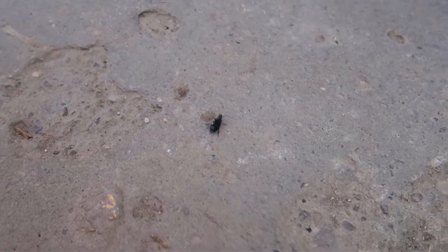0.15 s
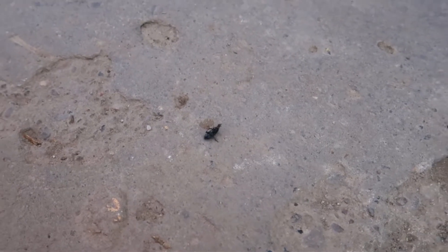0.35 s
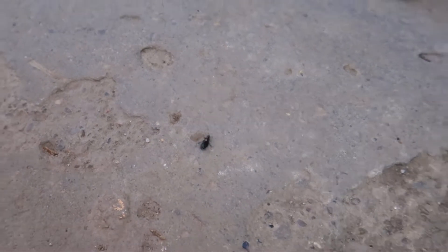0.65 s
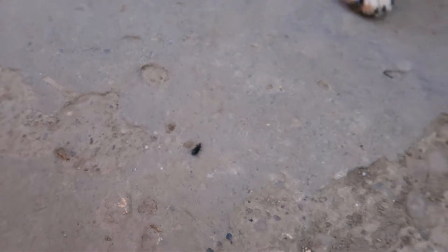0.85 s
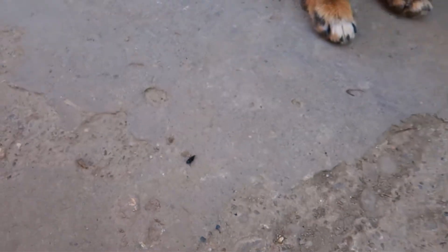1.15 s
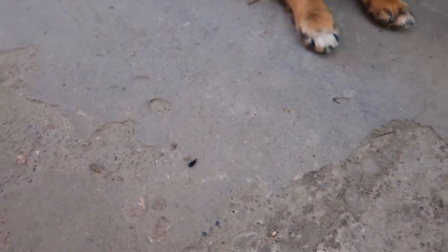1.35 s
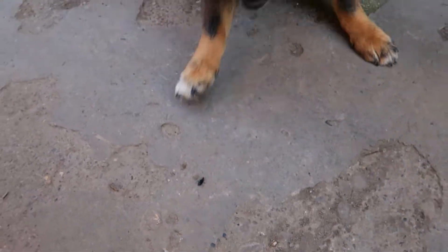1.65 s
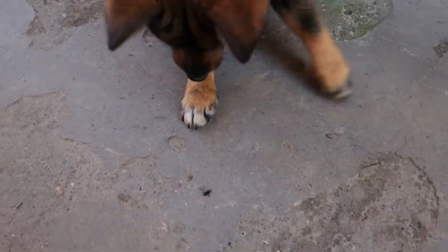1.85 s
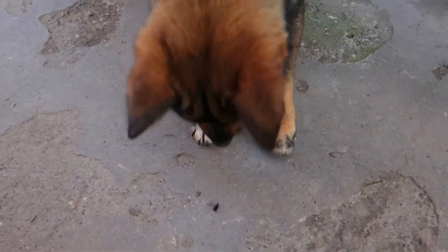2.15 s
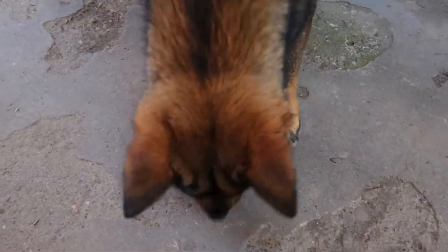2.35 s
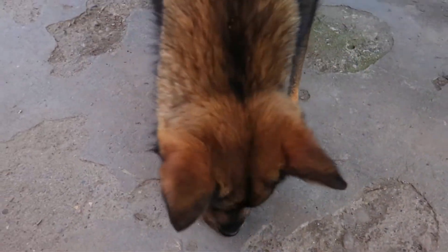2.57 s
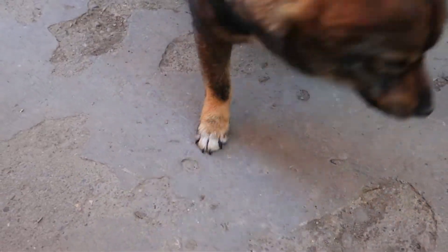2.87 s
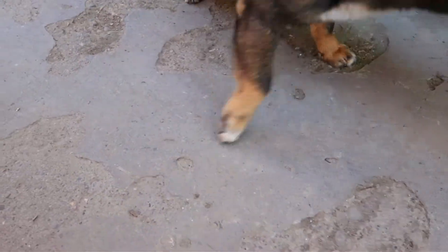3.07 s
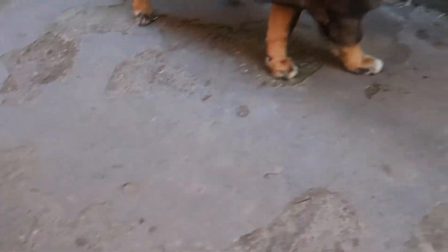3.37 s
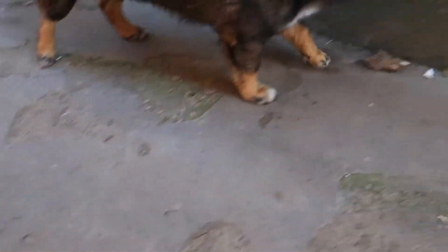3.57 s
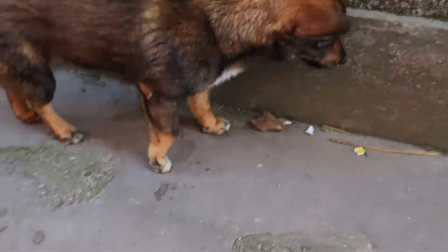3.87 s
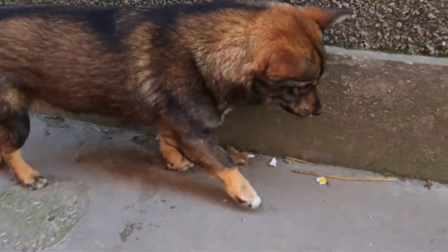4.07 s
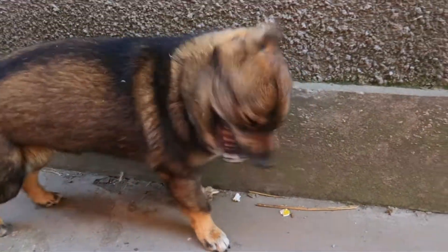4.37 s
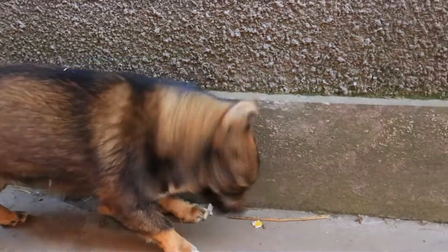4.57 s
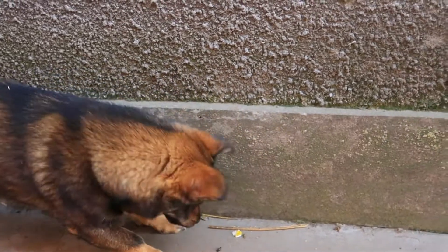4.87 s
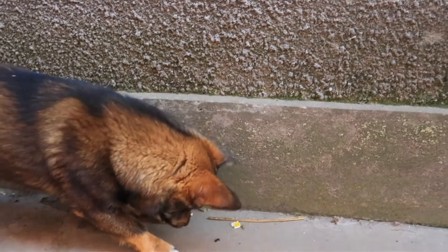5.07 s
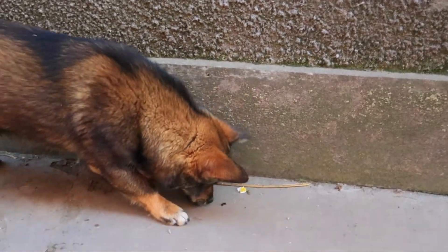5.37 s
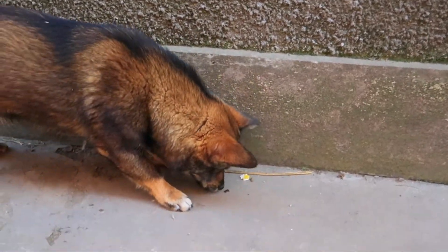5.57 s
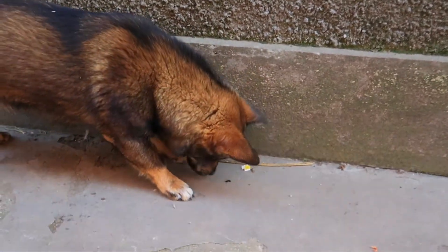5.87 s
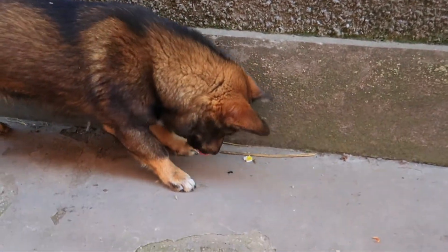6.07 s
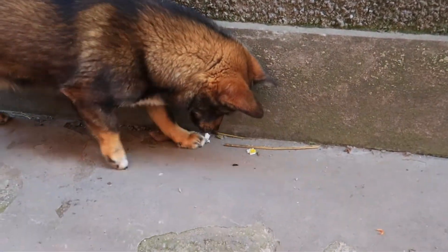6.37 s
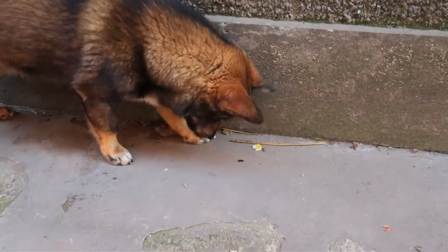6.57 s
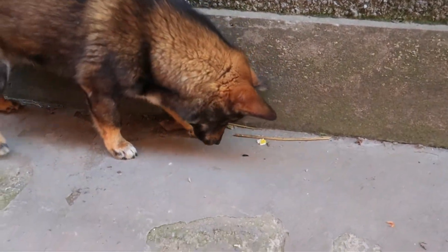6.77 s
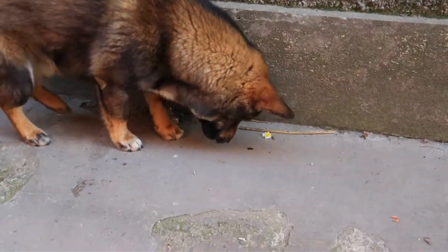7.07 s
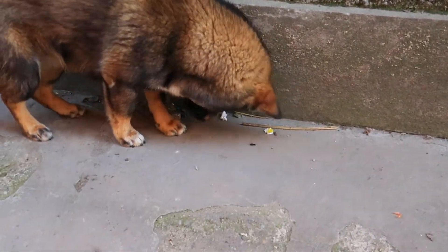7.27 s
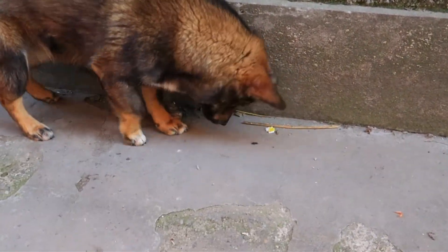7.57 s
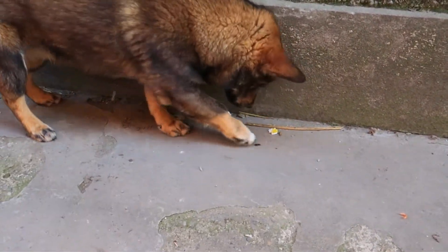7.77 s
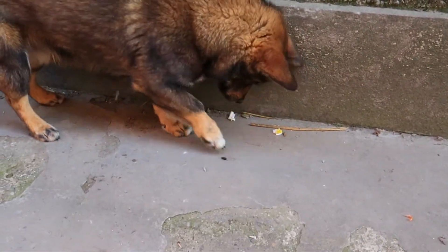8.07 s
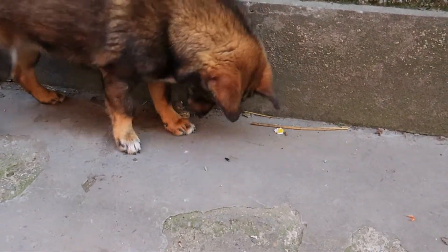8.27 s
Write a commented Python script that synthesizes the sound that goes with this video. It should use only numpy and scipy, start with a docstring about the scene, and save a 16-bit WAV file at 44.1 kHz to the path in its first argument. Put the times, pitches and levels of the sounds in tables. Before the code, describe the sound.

Low rattly dog grunts repeat close by over a soft outdoor rumble and bird whistles, with claw clicks, paw thuds and gritty scuffs.

```python
"""From the start a low outdoor rumble of shaped noise lies under small birds' gliding whistles between walls.
At once a puppy stalking a beetle in a concrete yard grunts: slow pulses ring its chest, throat and muzzle.
Soon claws tick (noise bursts), pads thud (short low tones), a hollow body rings and paws scuff (gritty noise).
These crowd together as it pounces after four seconds, with dull rubs of low noise that return near the end;
sand rustles softly throughout, as scattered grains of noise."""
import sys
import numpy as np
from scipy import signal
from scipy.fft import rfft, irfft, next_fast_len
from scipy.io import wavfile
from scipy.ndimage import map_coordinates

SR = 44100
rng = np.random.default_rng(int(sys.argv[2]) if len(sys.argv) > 2 else 0)


def to_wav(sig):
    """Store sig (one row per channel, or 1-D mono) as 16-bit WAV at the path in sys.argv[1].

    Samples outside -1..1 are clipped; the rate is SR.
    """
    pcm = np.clip(np.atleast_2d(sig), -1, 1) * 32767
    pcm = np.round(pcm).astype(np.int16)
    wavfile.write(sys.argv[1], SR, pcm.T)  # frames by channels


N = 371763


def amp(db):
    """Decibels to gain."""
    return 10 ** (np.asarray(db) / 20)


def unit(x):
    """Scale to an average (rms) strength of 1."""
    return x / np.sqrt(np.mean(x ** 2) + 1e-20)


def along(points, hz):
    """Read (pitch_hz, value) points on a log pitch axis."""
    point_hz, values = np.transpose(points)
    return np.interp(np.log(hz + 1), np.log(point_hz), values)


def over_time(points):
    """Read (time_s, value) points at every sample."""
    times, values = np.transpose(points)
    return np.interp(np.arange(N) / SR, times, values)


def wobble(rate, size):
    """A smooth random curve through `rate` random points a second."""
    return map_coordinates(rng.standard_normal(4096), [np.arange(size) * rate / SR], mode="wrap")


def noise(size):
    """Up to a second of white noise."""
    return rng.standard_normal(SR)[:size]


def filtered(x, response):
    """Multiply the spectrum of x by a response to frequency."""
    n = x.shape[-1]
    padded = next_fast_len(n + SR // 4)
    return irfft(rfft(x, padded) * response(np.fft.rfftfreq(padded, 1 / SR)), padded)[..., :n]


def band(x, hz, octaves):
    """Keep a bell-shaped band round hz, scaled to rms 1."""
    return unit(filtered(x, lambda f: np.exp(-.5 * (np.log2((f + 1) / hz) / octaves) ** 2)))


def resonate(x, modes):
    """Ring parallel (pitch_hz, width_hz, level_db) resonances, then trim steeply below and above."""
    def response(f):
        return sum(amp(db) * 1j * f * width / (hz * hz - f * f + 1j * f * width) for hz, width, db in modes)

    edges_hz = [modes[0][0] / 2, min(modes[-1][0] * 0.84, SR / 3)]
    trim = signal.butter(3, edges_hz, "band", fs=SR, output="sos")
    return signal.sosfilt(trim, filtered(x, response))


def add(track, s, x):
    """Mix x into the track from s seconds on."""
    part = track[max(round(s * SR), 0):][:len(x)]
    part += x[:len(part)]


def in_yard(x, wet_db, pan_db=0, left_lead_ms=0.036):
    """Direct sound reaches one side first; the walls answer with noise whose treble and bass fade apart."""
    # how long the walls ring: pitch_hz, time to fall 60 dB (s)
    walls = [(150, 0.054), (600, 0.24), (2800, 0.32), (5000, 0.21), (12000, 0.13)]
    hz, t, cells = signal.stft(rng.standard_normal((2, SR // 2)), SR, nperseg=256)
    fading = cells * amp(-60 * t / along(walls, hz)[:, None])
    tail = signal.istft(fading, SR, nperseg=256)[1]
    # the answer starts 5 ms late
    tail = np.pad(tail / np.linalg.norm(tail[0]), ((0, 0), (SR // 200, 0)))
    sides = np.array([[.5], [-.5]])  # left, right
    direct = filtered(x, lambda f: np.exp(2j * np.pi * f * sides * left_lead_ms / 1000))
    answer = signal.fftconvolve(x[None], tail, axes=1)[:, :N]
    return (direct + amp(wet_db) * answer) * amp(sides * pan_db)


def echoed(x, delay=.03, echo_db=-8):
    """Sound bounces twice between facing walls, weaker each time (delay in seconds)."""
    out = x.copy()
    for bounce in (1, 2):
        add(out, bounce * delay, amp(bounce * echo_db) * x)
    return out


def rush(spectrum):
    """Stereo noise of rms 1 with a given colour, nearly mono in the bass."""
    # how alike left and right are: pitch_hz, likeness (0 to 1)
    alike = [(50, 1), (250, 0.71), (1000, 0.18), (3000, 0.012), (10000, 0.052)]

    def mid_and_side(hz):
        turn = np.arccos(np.clip(along(alike, hz), -1, 1)) / 2
        return amp(along(spectrum, hz)) * [np.cos(turn), np.sin(turn)]

    mid, side = filtered(rng.standard_normal((2, N)), mid_and_side)
    return unit(np.array([mid + side, mid - side]))


def outdoors(rumble_sway_db=4.0, yard_db=-51.5, yard_sway_db=2.5, hiss_db=-58.5):
    """Coloured noise makes an unsteady low rumble, a gently swaying wash of the yard and a fine hiss."""
    # colours of the three noises: pitch_hz, level_db (relative, per Hz)
    rumble_colour = [(15, -35), (25, -14), (36, 0.5), (48, 5.5), (62, -4.5), (80, -1.5), (100, -10),
                     (120, -5), (160, -15.5), (260, -73)]
    yard_colour = [(71, -23), (120, -2.5), (283, 1.5), (489, -4.5), (658, -4.5), (722, -8), (1230, -11.5),
                   (1370, -12), (2400, -19.5), (2600, -16.5), (5000, -35.5), (6500, -60), (11000, -120)]
    hiss_colour = [(2000, 8.5), (4000, 7.5), (6000, 2), (8000, -4), (11000, -3.5), (13500, -8.5),
                   (15500, -32)]
    # slow rise and fall of the rumble, before its random sway: time_s, level_db
    rumble_level = [(0, -52), (1.3, -48), (2.2, -53), (3.7, -47), (4.7, -51), (7.35, -51), (7.7, -44),
                    (8, -51), (8.43, -50)]
    low = amp(over_time(rumble_level) + rumble_sway_db * wobble(22, N)) * rush(rumble_colour)
    wash = amp(yard_db + yard_sway_db * wobble(19, N)) * rush(yard_colour)
    return low + wash + amp(hiss_db) * rush(hiss_colour)


def syllable(length, middle_hz, fall, rasp, flicker_db=2.5, overtone_db=-29, buzz_hz=520, buzz_depth=1.04,
             warble_hz=130, warble_rate=170):
    """A gliding, warbling whistle of rms 1; a fast buzz splits a raspy one into parallel strands."""
    n = int(length * SR)
    bend, rasp_hz = 1.24, 520  # the glide is steepest at first; rasp also shakes the pitch
    glide = np.linspace(1, 0, n) ** bend - .5 ** bend
    hz = middle_hz * 2 ** (fall * glide)
    hz += rasp ** 2 * rasp_hz * wobble(702, n)
    hz += rasp * warble_hz * wobble(warble_rate, n)
    buzz = rasp * buzz_depth * np.sin(2 * np.pi * buzz_hz * np.arange(n) / SR)
    phase = 2 * np.pi * np.cumsum(hz) / SR + buzz
    whistle = np.sin(phase) + amp(overtone_db) * np.sin(2 * phase)
    whistle *= amp(flicker_db * wobble(147, n))
    return unit(whistle * signal.windows.tukey(n, .5))


def birds(near_db=-1.26, far_db=-5.0, near_wet_db=-3.4, far_wet_db=3.0):
    """Whistled notes are strung into calls; the walls smear the faint, raspy ones most."""
    # chirps and the parts of longer calls: start_s, length_s, middle_pitch_hz, level_db (relative),
    # fall_octaves (below 0 it rises), rasp (0 to 1)
    chirps = [(0, 0.026, 2280, -45, 0.25, 0.53), (0, 0.05, 3755, -47.5, 0.24, 0.76),
              (.1, 0.028, 4320, -52.5, -0.36, 0.58), (.118, 0.028, 2650, -42.5, -0.36, 0.62),
              (0.151, 0.086, 2800, -52, -0.032, 0.85), (0.191, 0.065, 2686, -51, 0.31, 0.24),
              (1.155, 0.052, 4900, -56, -0.058, 0.64), (1.19, 0.11, 3900, -50, 0.072, 0.74),
              (1.26, 0.024, 2806, -49.5, -0.13, 0.32), (1.39, 0.074, 3700, -55, -0.0046, 1),
              (1.435, 0.058, 2600, -50, 0.16, 0.66), (1.471, 0.042, 4360, -54.5, -0.041, 0.63),
              (1.504, 0.072, 3000, -47, 0.24, 0.72), (1.678, .09, 4350, -56, 0.81, 0.28),
              (1.768, 0.036, 3350, -46.5, 0.07, 0.29), (1.772, 0.032, 2850, -46, 0.11, 0.39),
              (1.857, 0.052, 4750, -45.5, .04, 0.53), (1.852, 0.059, 4000, -43, 0.15, 0.61),
              (1.897, 0.056, 3600, -43.5, 0.11, .3), (1.915, 0.041, 4030, -44, 0.057, 0.3),
              (1.953, .031, 3400, -44.5, 0.033, 0.44), (1.984, .065, 3050, -55.5, .5, .3),
              (2.139, 0.042, 4100, -47.5, 0.063, 1), (2.144, 0.075, 3100, -47.5, 0.44, 0.66),
              (2.235, 0.061, 2705, -50, 0.018, 0.58), (2.39, 0.056, 3400, -52, 0.25, 1),
              (3.612, .04, 4100, -51.5, 0.13, 0.96), (3.63, 0.048, 3400, -42, -0.12, 0.44),
              (3.674, 0.038, 2950, -41.5, 0.34, 0.34), (3.716, 0.031, 2900, -51, 0.28, 0.64),
              (5.376, 0.032, 3890, -44.5, -.15, 0.59), (5.406, 0.02, 5030, -42, -0.21, 0.27),
              (5.422, 0.053, 3900, -41.5, 0.11, 0.64), (5.443, 0.025, 3610, -39.5, 0.1, 0.27),
              (5.47, 0.037, 4150, -47, 0.21, 0.62), (5.484, 0.023, 3220, -39, 0.11, 0.31),
              (5.605, 0.049, 4400, -52.5, 0.033, 1), (5.63, 0.048, 3100, -42, 0.23, 0.5),
              (5.68, 0.054, 2680, -48.5, 0.29, 0.26), (6.357, .035, 4110, -54.5, -0.019, .1),
              (6.378, 0.035, 5330, -50, 0.038, 0.67), (6.408, 0.02, 4810, -42, 0.26, 0.17),
              (6.416, 0.029, 3960, -45, 0.2, 0.26), (6.451, 0.052, 4220, -49, 0.13, .35),
              (6.49, 0.047, 2850, -59.5, 0.38, 0.22), (6.764, 0.11, 4170, -58.5, 0.23, 0.53),
              (6.794, 0.11, 2900, -50, 0.39, 0.43), (6.84, 0.095, 3490, -51.5, 0.13, 0.58),
              (6.935, .03, 3170, -51, -0.3, 0.35), (6.96, 0.066, 3110, -56, 0.15, 0.66),
              (8.355, 0.021, 3530, -45.5, 0.09, 0.97)]
    # a far bird repeats one faint note: start_s, level_db (relative)
    far_notes = [(2.894, -65), (3.066, -61.5), (3.265, -62), (4.989, -59.5), (5.199, -64), (5.895, -61),
                 (6.09, -61.5), (6.276, -61), (7.195, -63.5), (7.948, -58.5), (8.167, -59)]
    # chirps this loud are close and direct; this faint, raspy ones come mostly off the walls
    loud_db, faint_db = -36, -53
    far_lead_s = .01  # a smeared note takes this long to build up
    near, far = np.zeros((2, N))
    for s, length, hz, db, fall, rasp in chirps:
        note = amp(db) * syllable(length, hz, fall, rasp)
        distance = np.clip((loud_db - db) / (loud_db - faint_db), 0, 1) * np.clip(rasp, 0, 1)
        add(near, s, amp(near_db) * np.sqrt(1 - distance) * note)
        add(far, s - far_lead_s, amp(far_db) * np.sqrt(distance) * note)
    for s, db in far_notes:
        add(near, s, amp(db) * syllable(length=.062, middle_hz=3120, fall=.244, rasp=.51))
    direct_birds = in_yard(near, wet_db=near_wet_db, pan_db=-2.0, left_lead_ms=-0.058)
    smeared = echoed(far, delay=.055, echo_db=-9.5)
    return direct_birds + in_yard(smeared, wet_db=far_wet_db, pan_db=-3.5, left_lead_ms=-0.058)


def grit(grains_per_s=70, grain_t60=0.15):
    """Sand grains rustle under the paws: random cracks of noise, each fading until cut off at 1/30 s."""
    # how briskly the puppy moves: time_s, level_db of the grit under its paws
    stir = [(0, -73), (2.3, -67.5), (3.5, -70), (4.1, -77), (4.4, -60.5), (4.8, -73), (5.1, -74),
            (8.43, -71)]
    sizes = amp(2 * np.minimum(rng.exponential(size=N), 4))
    cracks = (rng.random(N) < grains_per_s / SR) * sizes
    t = np.arange(SR // 30) / SR
    fading = signal.fftconvolve(cracks, amp(-60 * t / grain_t60))[:N]
    rustle = band(fading * rng.standard_normal(N), 4500, 1.1)
    return amp(over_time(stir)) * rustle


def swell(shape, u):
    """Attack, hold and release in dB while u runs from 0 to 1."""
    attack, release, start_db, end_db = shape
    rising = -start_db * np.clip(1 - u / attack, 0, 1)
    return rising - end_db * np.clip((u - release) / max(1 - release, .01), 0, 1)


def grunts(waver=0.011, jitter=0.00181, scatter_db=1.56, rebound_phase=0.592, opening=0.0495, sag=.8,
           ring_cycles=0.55, throat_db=-4.5, pop_db=-12.5, mouth_db=-13.5, lip_db=-13.5, nose_db=-2.5):
    """Slack vocal folds slap and rebound about 40 times a second, ringing chest, throat, mouth and muzzle."""
    # grunts: start_s, length_s, level_db, first_pulse_rate_hz, muzzle_pitch_hz, muzzle_ring_db,
    # muzzle_rasp_db, nose_db, roughness (0 to 1); all levels relative
    grunt_rows = [(.043, 0.2, -33.5, 52.5, 1290, -28, -12.5, -15, 0.38),
                  (.594, 0.23, -35.5, 52.14, 1203, -4, -4.5, -22, 0.26),
                  (1.06, .19, -37, 47.6, 1180, -7, -7, -17, 0.35),
                  (1.491, .28, -40.5, 38.74, 1267, -24, -10, -17, 0.057),
                  (2.382, 0.24, -36.5, 45, 1162, -12.5, -10, -19, 0.3),
                  (2.623, .19, -40, 41.96, 1220, -15, -15, -36, 0.48),
                  (2.842, 0.16, -35.5, 45.63, 1120, -10, -11.5, -26, .47),
                  (3.161, 0.17, -37.5, 43.37, 1160, -11, -13.5, -20, 0.47),
                  (3.468, 0.21, -34.5, 42.16, 1024, -11, -13.5, -22.5, 0.62),
                  (3.766, 0.19, -37, 39.67, 1100, -13, -16, -24, 0.65),
                  (4.159, 0.212, -36, 39.47, 1150, -28, -16, -41, 0.61),
                  (5.123, 0.25, -41, 37.02, 1176, -21, -13.5, -19, 0.069),
                  (5.745, 0.31, -44.5, 37.14, 1230, -30, -17, -27, 0.29),
                  (6.602, 0.2, -43.5, 37.05, 1135, -32, -14, -18, 0.35),
                  (7.192, .21, -40, 37.7, 1204, -22, -17.5, -22, 0.56),
                  (7.961, 0.16, -43, 37.4, 1140, -23, -19, -19, 0.42)]
    # resonances of the body and the dry pop of each slap: pitch_hz, width_hz, level_db (relative)
    chest_modes = [(74.7, 32, -7), (121, 18, -2)]
    throat_modes = [(216.7, 8.7, 12.5), (282.4, 17.6, 14), (330.7, 11, 5), (347, 15, -19), (531, 48, -43)]
    pop_modes = [(260, 99, -3), (556, 170, -12)]
    mouth_modes = [(608, 35, 2), (698, 55, 6), (799, 38, 4.5), (937, 50, 0.5), (1080, 150, -4)]
    nose_modes = [(2650, 290, -3), (2950, 350, -9), (3700, 510, -11)]
    # muzzle resonances, passed through twice: multiple of the muzzle pitch, width_hz, level_db (each pass)
    muzzle_modes = [(.82, 170, -6.5), (1, 119, 8.5), (1.22, 228, 4), (1.42, 260, 3.5)]
    # how each part swells and fades: attack end and release start (shares of the grunt),
    # start_db and end_db (how far down it is at the start and end)
    chest_swell = (0.37, 0.63, 13, 16)
    throat_swell = (.3, .62, 11, 12)
    muzzle_swell = (.3, .5, 9, 19)
    slack_hz = 36.59  # the pulse rate sags to this as the air runs out
    chest_db, rough_chest_loss_db = 5.5, 14.5  # a smooth grunt's chest; what full roughness takes away
    mouth_follows, loud_grunt_db = 0.89, -41  # the mouth fades less than the throat as grunts soften
    puff_cycles, throat_rebound = .17, .35
    snarl_delay_s = .031  # the muzzle joins abruptly, on the first full slap
    muzzle_smear = 0.79  # steady leak that builds up between the puffs
    lip_hz, lip_rise_oct, lip_width_hz = 1396, .42, 69  # this resonance climbs as the lips draw back
    # the muzzle rings purely on the first few slaps, sinks this far, then fades with the grunt
    ring_hold_s, ring_fall_db_per_s, ring_sink_db = 0.031, 227, 12
    fade_s = .035  # soft lead-in and tail round each grunt
    out = np.zeros(N)
    for start, length, level, first_hz, muzzle_hz, pure_db, rasp_db, nasal_db, rough in grunt_rows:
        n = int((length + 2 * fade_s) * SR)
        t = np.arange(n) / SR - fade_s
        u = np.clip(t / length, 0, 1)  # progress through the grunt
        rate = slack_hz + (first_hz - slack_hz) * (1 - u) ** sag
        cycle = np.cumsum(rate) / SR + rough * jitter * first_hz * wobble(39.88, n)
        cycle = cycle - cycle[int((fade_s + snarl_delay_s) * SR)]
        joined = cycle >= 0
        sizes = amp(scatter_db * wobble(65.4, n))

        def slaps(phase):
            return sizes * np.diff(np.floor(cycle - phase), prepend=np.floor(cycle[0] - phase))

        age = (cycle % 1) / puff_cycles
        puff = age * np.exp(1 - age) * sizes
        air = unit(noise(n) * (1 + puff))

        def breathy(pulses, share):
            share = min(share, 1)
            return np.sqrt(1 - share) * unit(pulses) + np.sqrt(share) * air

        # chest and throat ring on between the slaps; each slap also gives a dry pop
        first, second = slaps(0), slaps(rebound_phase)
        throat_pulses = first + throat_rebound * second
        chest = unit(resonate(-breathy(first + second, rough ** 2), chest_modes))
        throat = unit(resonate(breathy(throat_pulses, rough ** 2), throat_modes))
        pop = unit(resonate(breathy(first, rough ** 2), pop_modes))
        mouth = unit(resonate(breathy(throat_pulses, rough), mouth_modes))
        throat_shape_db = swell(throat_swell, u)
        soft_mouth_db = (1 - mouth_follows) * (loud_grunt_db - level)
        voice = amp(swell(chest_swell, u) + chest_db - rough_chest_loss_db * rough) * chest
        voice += amp(throat_shape_db + throat_db) * throat
        voice += amp(throat_shape_db + pop_db) * pop
        voice += amp(throat_shape_db + mouth_db + soft_mouth_db) * mouth

        # each opening lets a puff through muzzle and nose; the muzzle resonance rises as the lips part
        puffs = unit(noise(n) * (puff + muzzle_smear * u) * joined)

        def snarl(hz):
            modes = [(hz * multiple, width, db) for multiple, width, db in muzzle_modes]
            return unit(resonate(resonate(puffs, modes), modes))

        lips = unit((1 - u) * snarl(muzzle_hz * (1 - opening)) + u * snarl(muzzle_hz * (1 + opening)))
        upper_hz = lip_hz * 2 ** (lip_rise_oct * u) + lip_width_hz * wobble(700, n)
        upper_tone = np.sin(2 * np.pi * np.cumsum(upper_hz) / SR) * wobble(303.7, n)
        lips += amp(lip_db) * unit(upper_tone * (puff + u) * joined)
        nose = unit(resonate(puffs + air / 2, nose_modes))
        voice += amp(swell(muzzle_swell, u)) * (amp(rasp_db) * lips + amp(nasal_db + nose_db) * nose)

        # the first puffs set the muzzle ringing almost purely
        ring_hz = muzzle_hz * (1 + opening * (2 * u - 1) + waver * wobble(231, n))
        flutter = np.sin(np.pi * np.clip((cycle % 1) / ring_cycles, 0, 1)) * joined * sizes
        sinking_db = np.clip(ring_fall_db_per_s * (t - snarl_delay_s - ring_hold_s), 0, ring_sink_db)
        fading_db = sinking_db - swell(muzzle_swell, np.maximum(u, muzzle_swell[0]))
        ring = 2 * (flutter + u ** 2 / 2) * np.sin(2 * np.pi * np.cumsum(ring_hz) / SR)
        voice += amp(pure_db - fading_db) * ring
        edges = np.clip(np.minimum(t + fade_s, length + fade_s - t) / (1.14 * fade_s), 0, 1)
        add(out, start - fade_s, amp(level) * voice * edges)
    return out


def claws(level_db=2):
    """Claws on concrete give hard, dry ticks: short bursts of noise in a band."""
    # ticks: start_s, peak_db (relative), pitch_hz, width_octaves
    claw_rows = [(0.418, -44, 4640, 0.42), (2.7884, -44, 2700, 0.6), (2.874, -44.5, 2300, 0.98),
                 (2.9523, -43, 2210, 1), (3.5865, -39, 2850, .7), (4.304, -39, 4070, 0.4),
                 (4.327, -42, 2730, 0.15), (4.37, -44, 4080, 0.36), (4.394, -52, 4200, .5),
                 (4.4122, -44, 2400, 0.32), (4.446, -52, 2800, 0.57), (4.759, -37, 4040, 0.58),
                 (4.829, -50, 4850, 0.17), (5.154, -46.5, 2260, 0.18), (6.976, -44, 2870, 1),
                 (7.0256, -35, 2700, 1), (8.261, -44, 7740, 0.49), (8.27, -43, 7400, 0.85),
                 (8.33, -34.5, 2550, 0.37), (8.3297, -38, 7500, 0.79), (8.3365, -41, 6500, 0.79)]
    out, t = np.zeros(N), np.arange(SR // 16) / SR
    t60 = .026  # seconds to fall 60 dB
    for s, db, hz, octaves in claw_rows:
        tick = band(noise(len(t)), hz, octaves) * amp(-60 * t / t60)
        add(out, s, amp(db + level_db) * tick / np.abs(tick).max())
    return out


def thuds(rise=0.0055, level_db=-1):
    """Soft pads give a low push: two tones that swell for `rise` seconds and die away."""
    # paw falls: start_s, level_db (relative), pitch_hz (of the lower tone)
    thud_rows = [(0.503, -34, 183), (3.454, -30, 93), (3.52, -21.5, 81), (3.596, -30.5, 354),
                 (4.3331, -19, 241), (4.339, -28, 148), (4.353, -28, 213), (4.393, -28.5, 236),
                 (4.516, -22, 178), (4.536, -25.5, 339), (5.594, -35.5, 213), (6.628, -35, 60),
                 (7.411, -30, 191), (7.619, -30.5, 171)]
    out, t = np.zeros(N), np.arange(SR // 8) / SR
    for s, db, hz in thud_rows:
        push = np.sin(2 * np.pi * hz * t) + 0.5 * np.sin(2 * np.pi * hz * 1.566 * t)
        add(out, s, amp(db + level_db) * push * t / rise * np.exp(1 - t / rise))
    return out


def knocks(rattle_t60=.22, rattle_db=-28.0, rattle_grain_db=4.5, level_db=2.0):
    """A blow rings a hollow body briefly; a gritty rattle keeps its upper modes going."""
    # blows: start_s, peak_db (relative), brightness_hz (treble fades above it), pitch_ratio (to the body's)
    knock_rows = [(0.505, -32.5, 1720, 1.12), (2.789, -41, 2400, 1.5), (3.597, -26, 1300, 0.97),
                  (4.394, -32, 900, 0.94), (4.5421, -14, 2070, 0.94), (4.555, -26, 2200, 0.94),
                  (4.602, -22.5, 1300, 0.974), (4.617, -42.5, 1200, 0.87), (6.955, -35, 650, 1.03),
                  (6.974, -32, 810, 1.06)]
    # the body's resonances: pitch_hz, width_hz, level_db (relative)
    hollow = [(539, 47, 20), (623, 105, 15), (797, 100, 9.5), (998, 110, 11), (1300, 61, 4),
              (1570, 100, 10), (1970, 200, -3), (2650, 200, 1)]
    out, t = np.zeros(N), np.arange(SR // 4) / SR
    for s, db, bright_hz, pitch in knock_rows:
        modes = [(hz * pitch, width, gain) for hz, width, gain in hollow]
        grain = unit(amp(rattle_grain_db * wobble(421, len(t))))
        rattle = noise(len(t)) * amp(rattle_db - 60 * t / rattle_t60) * grain
        blow = 1.0 * (t == 0)
        ring = resonate(blow, modes) + resonate(rattle, modes[1:])
        dulling = signal.butter(2, min(bright_hz, SR / 3), fs=SR, output="sos")
        ring = signal.sosfilt(dulling, ring)
        add(out, s, amp(db + level_db) * ring / np.abs(ring).max())
    return out


def stroke(length, colour, grain_db=-1.0):
    """Gritty friction of a given colour that swells fast and dies away over twice `length` seconds."""
    n = int(2 * length * SR)
    u = np.arange(n) / (length * SR / 4)
    return unit(colour(noise(n)) * amp(grain_db * wobble(338, n))) * u * np.exp(1 - u)


def scuffs(scuff_octaves=0.89, scuff_grain_db=2.5, squeak_grain_db=-1.0):
    """Paws scraping on concrete give broad, gritty scrapes and thin, narrow squeaks of noise."""
    # scrapes: start_s, length_s (half the stroke's span), level_db, pitch_hz (centre)
    scrape_rows = [(0.605, 0.085, -56, 3530), (2.472, 0.042, -54, 7400), (2.787, 0.0092, -50.5, 1660),
                   (3.092, 0.14, -59.5, 8850), (3.158, 0.052, -45, 6200), (3.593, 0.027, -38.5, 825),
                   (3.622, 0.083, -59, 9700), (4.023, 0.026, -48.5, 1850), (4.319, 0.081, -48.5, 4330),
                   (4.503, 0.059, -55, 6870), (4.547, 0.039, -39, 900), (4.638, 0.047, -55, 3300),
                   (4.721, 0.07, -61, 6000), (5.985, 0.24, -59, 5700), (7.028, 0.028, -47.5, 6200),
                   (7.911, 0.1, -53.5, 6500), (8.333, 0.038, -53, 5500)]
    # squeaks: start_s, length_s (half the stroke's span), level_db, pitch_hz, width_octaves
    squeak_rows = [(2.052, 0.064, -51.5, 1370, 0.79), (2.144, 0.079, -50.5, 1660, 0.32),
                   (3.648, 0.053, -51.5, 1590, 0.15), (4.326, 0.032, -39.5, 1790, 0.12),
                   (4.35, 0.019, -43, 1650, 0.095), (4.426, 0.021, -47, 1410, 0.29),
                   (4.52, 0.025, -44, 1700, 0.14), (5.619, 0.11, -55.5, 1490, 0.15),
                   (6.802, 0.1, -57, 1380, 0.21), (8.341, .022, -50, 2070, .05),
                   (8.35, 0.032, -50, 1730, 0.34)]
    out = np.zeros(N)
    for s, length, db, hz in scrape_rows:
        add(out, s, amp(db) * stroke(length, lambda x: band(x, hz, scuff_octaves), scuff_grain_db))
    for s, length, db, hz, octaves in squeak_rows:
        add(out, s, amp(db) * stroke(length, lambda x: band(x, hz, octaves), squeak_grain_db))
    return out


def rubs():
    """Dull strokes of low noise as the puppy lunges and noses at the ground."""
    # rubs: start_s, length_s (half the stroke's span), level_db
    rub_rows = [(4.327, 0.084, -34.5), (4.488, 0.054, -40), (7.418, 0.13, -42.5), (7.492, 0.16, -33.5)]
    # colour of the rubbing: pitch_hz, level_db (relative, per Hz)
    rub_colour = [(53, -37), (90, -6), (151, 3), (352, -3.5), (388, -16), (471, 2.5), (541, -10.5),
                  (998, -11.5), (2500, -39), (3250, -73), (5500, -120)]

    def dull(x):
        return filtered(x, lambda f: amp(along(rub_colour, f)))

    out = np.zeros(N)
    for s, length, db in rub_rows:
        add(out, s, amp(db) * stroke(length, dull))
    return out


def scene():
    """The puppy is close and dry; the birds are farther off, slightly right."""
    puppy = in_yard(grunts() + thuds() + rubs(), wet_db=-22.0)
    hollow_body = in_yard(knocks(), wet_db=-35.0, left_lead_ms=0)
    feet = in_yard(claws() + scuffs() + grit(), wet_db=-4.5, left_lead_ms=0.021)
    return outdoors() + birds() + puppy + hollow_body + feet


def record(dry):
    """Keep nothing at or above a treble limit of 15650 Hz."""
    return filtered(dry, lambda hz: hz < 15650)


dry = scene()
out = record(dry)
to_wav(out)
```